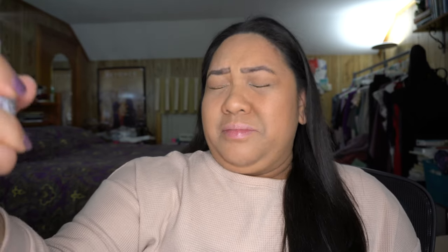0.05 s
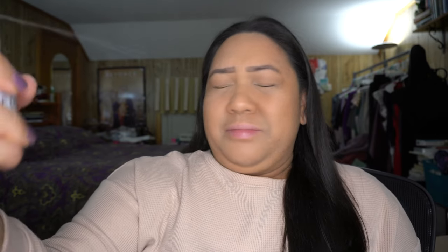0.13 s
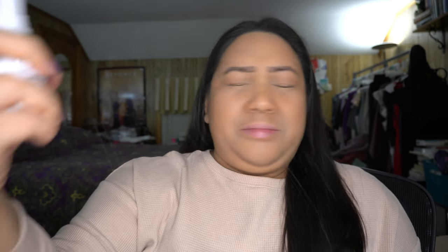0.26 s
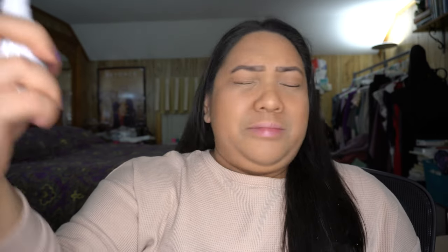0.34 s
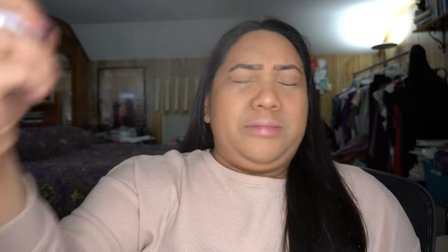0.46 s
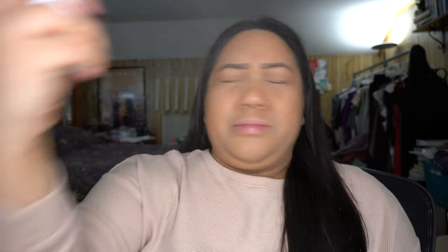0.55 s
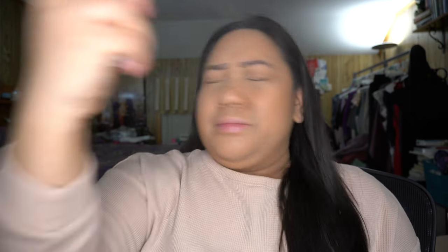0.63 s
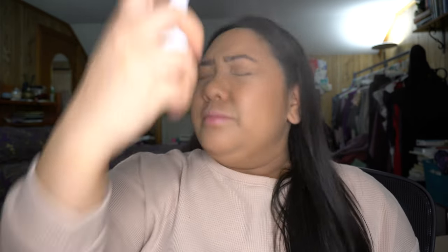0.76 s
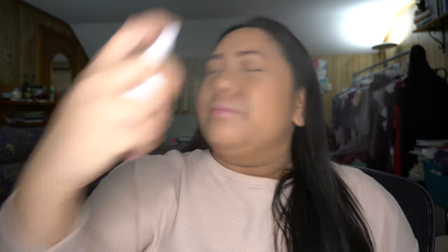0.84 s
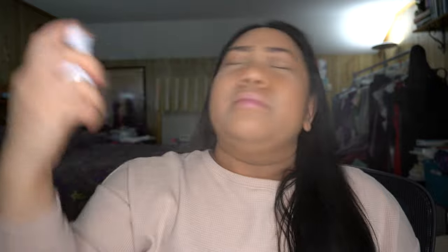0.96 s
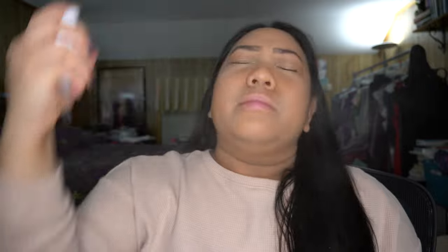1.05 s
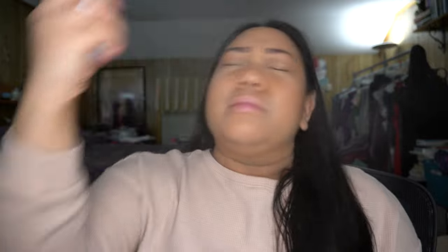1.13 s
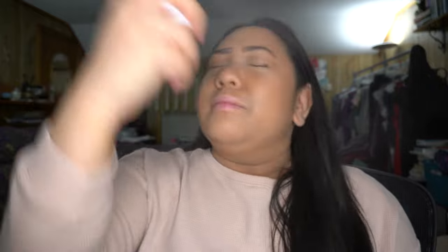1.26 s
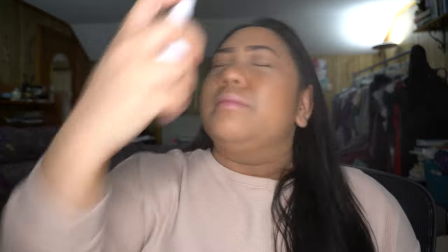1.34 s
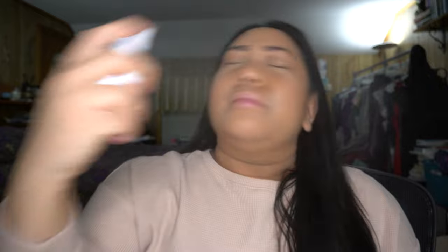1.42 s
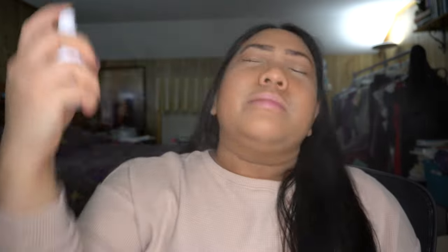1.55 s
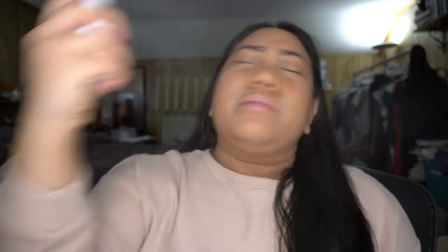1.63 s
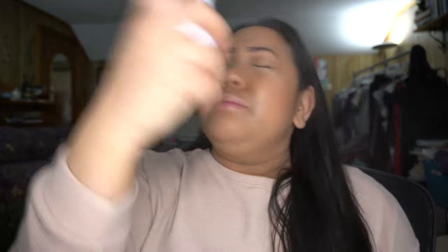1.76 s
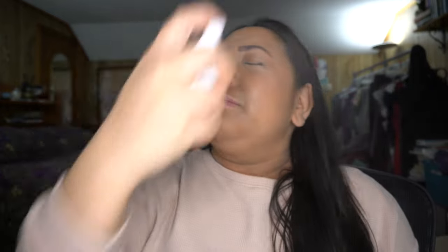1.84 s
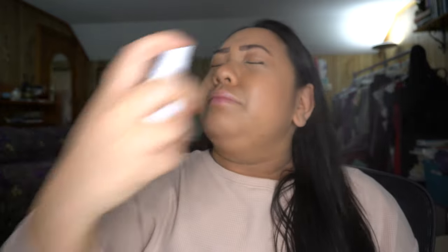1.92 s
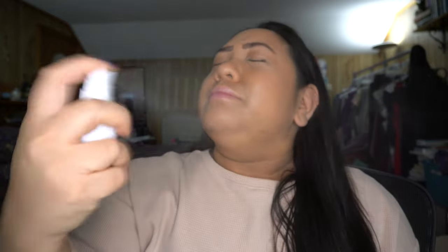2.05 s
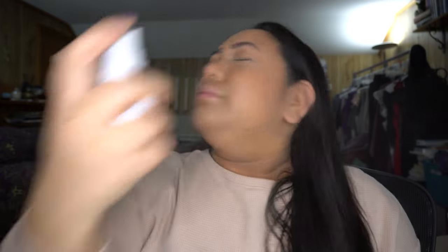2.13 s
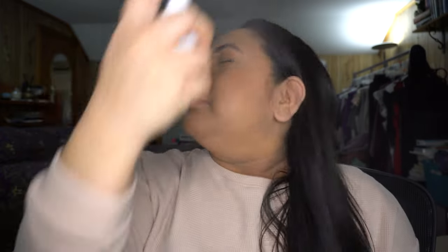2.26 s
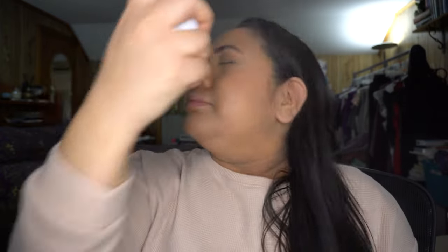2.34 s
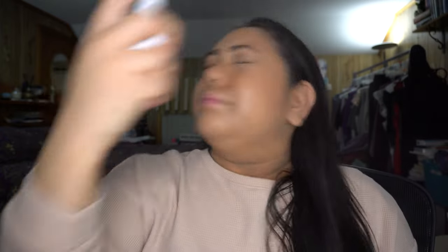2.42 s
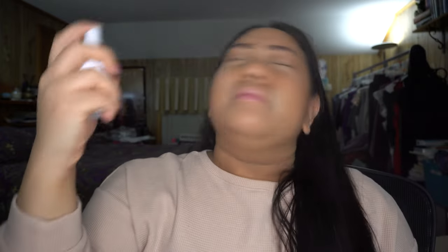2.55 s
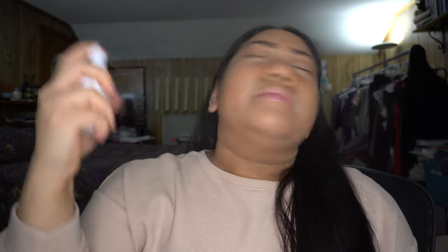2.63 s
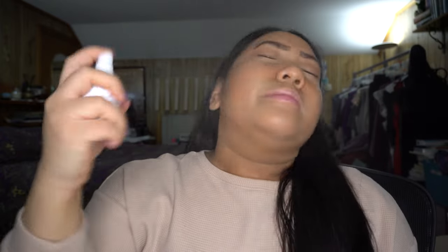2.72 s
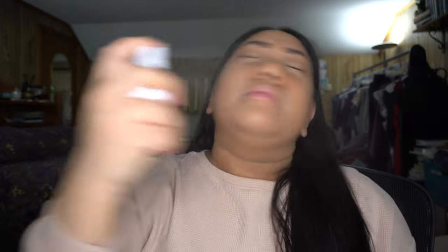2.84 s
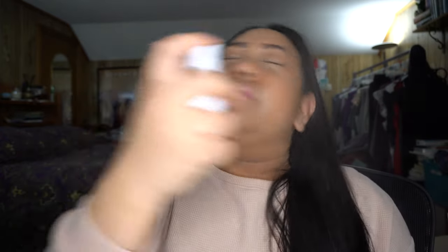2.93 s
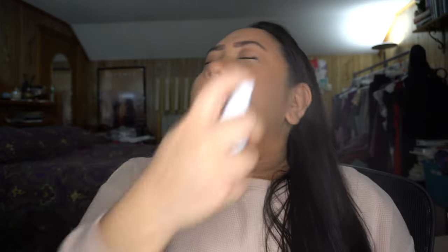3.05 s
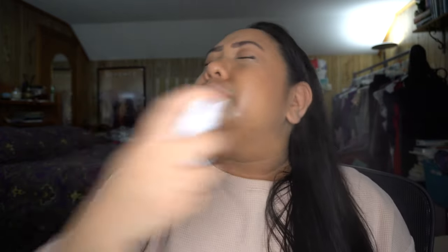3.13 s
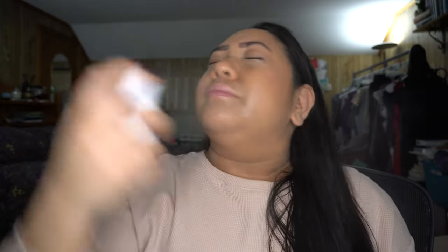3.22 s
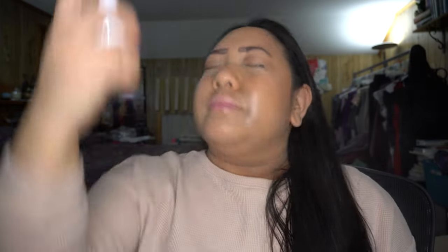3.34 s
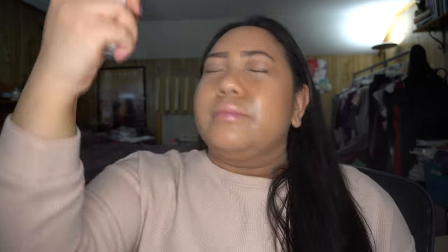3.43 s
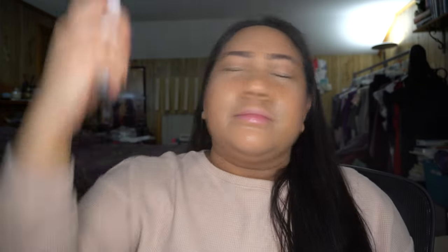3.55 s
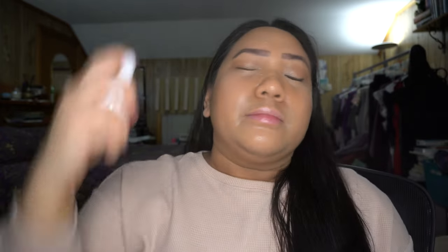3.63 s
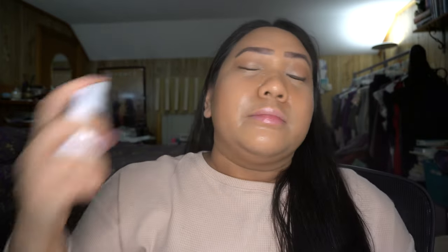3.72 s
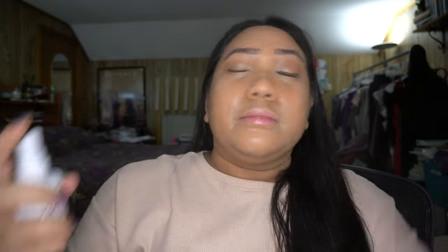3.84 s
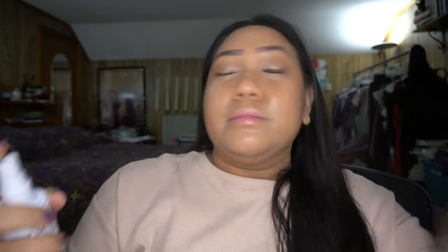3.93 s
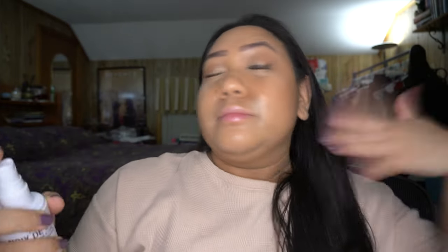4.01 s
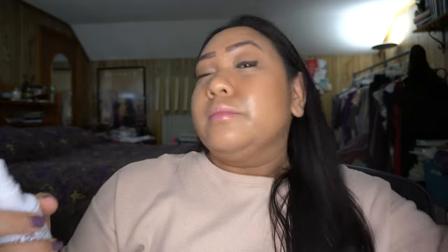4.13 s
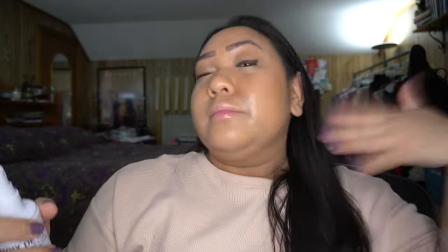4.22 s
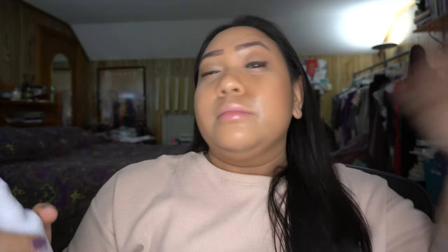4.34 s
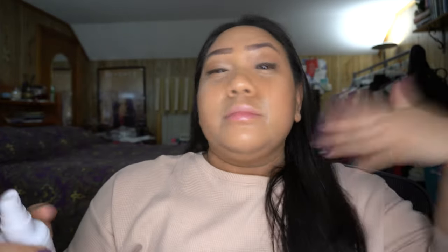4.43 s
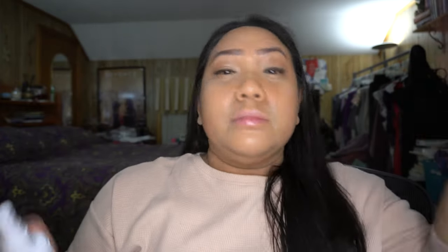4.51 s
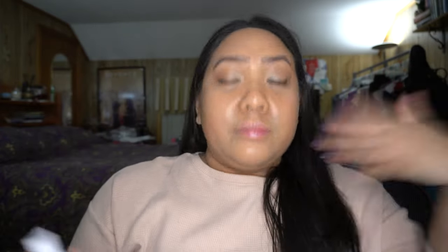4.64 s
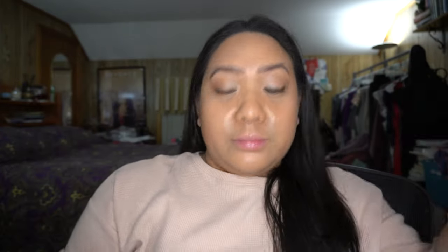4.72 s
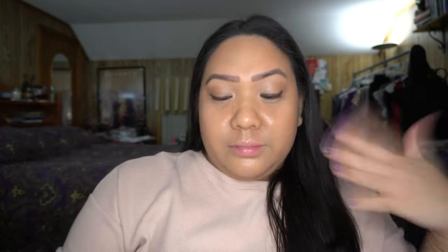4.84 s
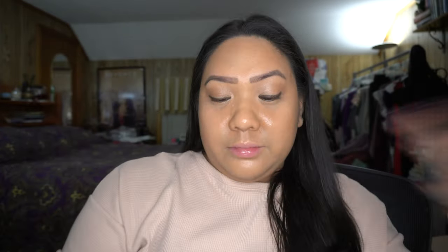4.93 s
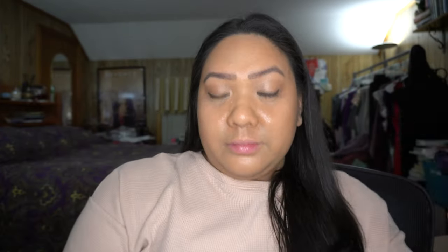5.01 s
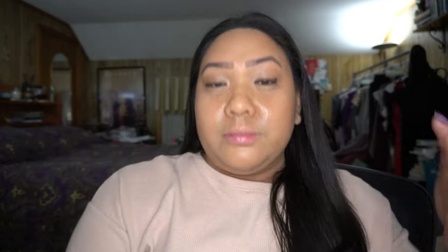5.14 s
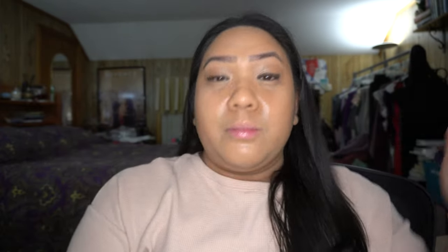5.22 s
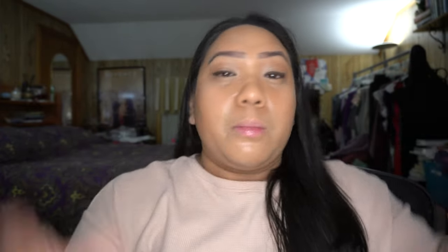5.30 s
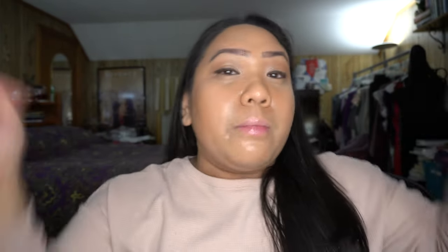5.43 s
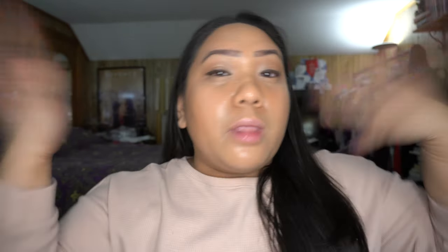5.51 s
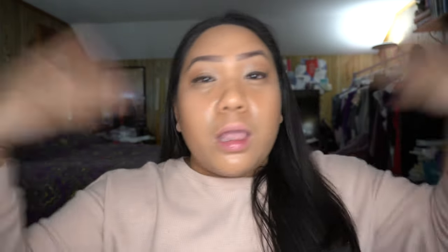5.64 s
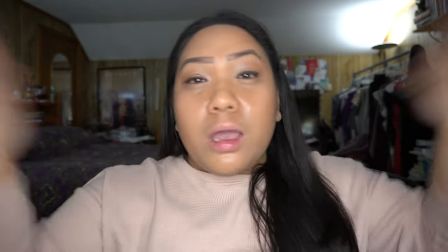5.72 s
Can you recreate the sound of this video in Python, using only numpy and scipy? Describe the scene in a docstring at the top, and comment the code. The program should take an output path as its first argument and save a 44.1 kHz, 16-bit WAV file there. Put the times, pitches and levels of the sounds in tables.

```python
"""Face mist from a pump bottle

A pump sprays eighteen times, about five a second, in a small furnished room. Its head ticks, a jet
hisses, the plunger plops at the end of a full stroke, and suction refills the chamber in between.
The bottle is then set on a desk, ringing its modes as it rocks to rest, and the lips smack sharply."""
import sys
import numpy as np
from scipy import signal
from scipy.fft import rfft, irfft, next_fast_len
from scipy.io import wavfile
from scipy.ndimage import uniform_filter1d

SR = 44100
rng = np.random.default_rng(int(sys.argv[2]) if len(sys.argv) > 2 else 0)


def int16_out(signal):
    """Quantize to a 16-bit WAV file."""
    q = np.round(np.clip(np.atleast_2d(signal).T, -1, 1) * 32767)
    wavfile.write(sys.argv[1], SR, q.astype(np.int16))


N = 254456

# The nozzle's hiss. Each row: frequency in Hz, relative spectral density in dB.
MIST_SPECTRUM = [(100, -29), (400, -18.5), (900, -10.5), (1300, -10.5), (1620, -3), (2300, -4),
                 (2900, -5.5), (3600, -1.5), (4600, -1.5), (5700, -9.5), (7300, -1.5), (9300, -8.5),
                 (11000, -4), (13000, -11.5), (15700, -12.5)]
# Each row: frequency in Hz, left-right coherence of the hiss.
MIST_COHERENCE = [(150, 0.14), (1000, 1), (3000, 0.86), (7000, 0.9), (15000, 0.99)]
# Pump strokes; short ones barely touch bottom. Each row: hiss start and length in seconds, level in dB,
# left over right in dB, slack from tick to hiss in seconds, tick level in dB, bottom plop level in dB.
STROKES = [(.069, 0.072, -32.5, 5.5, 0.034, -28.5, -67), (.386, 0.087, -30, 3.5, 0.024, -27.5, -43),
           (0.659, 0.096, -29, 1.2, 0.017, -23.5, -28.5), (.861, .098, -29.5, 1, 0.022, -21.5, -23.5),
           (1.056, 0.097, -30.5, 3, .0191, -20.5, -25.5), (1.243, 0.098, -29, 0, 0.015, -25, -23.5),
           (1.431, 0.098, -29.5, 1.9, 0.013, -28.5, -26.5), (1.637, 0.1, -29.5, 2, 0.014, -18, -30),
           (1.837, 0.089, -30, 1, 0.016, -16.5, -33.5), (2.026, .088, -30.5, 2.5, 0.019, -27, -27),
           (2.245, .096, -29.5, -0.5, 0.021, -23, -29.5), (2.472, .073, -32, 1.5, 0.03, -41, -41),
           (2.666, 0.091, -32.5, 2.5, 0.016, -25, -39), (2.853, 0.084, -31, 1.3, .027, -24.5, -36),
           (3.049, 0.08, -32.5, -1.5, .016, -25, -41), (3.233, 0.074, -31.5, 2.2, 0.017, -25.5, -53),
           (3.441, 0.079, -31, 2, .0202, -28.5, -57), (3.656, 0.03, -37, 2, 0.032, -29.5, -63)]
FIRM_DB = -28  # level of a firm stroke; effort is counted from it
TILT_DB, TILT_PER_DB = 1.21, 0.2  # its tilt in dB per octave, and the gain per dB of effort
JET_HZ, JET_HZ_PER_DB = 4100, 85  # the jet's resonance rises with effort too
PRIMING_TILT_DB, PRIMING_S = 10, .18  # air in the nozzle thins the first strokes: tilt, time constant

def sprays(attack_s=0.0029, release_s=0.0025, arch_db=3.5, sputter_db=0.87, face_echo=0.23,
           jet_gain=0.89, jet_width_hz=800, jet_scatter_hz=110, lag_s_per_db=8e-6, size=8192):
    """Jet noise: the hiss swells with the finger's pressure and stops when the valve shuts."""
    out, t = np.zeros((2, N)), np.arange(size) / SR
    sides = np.array([[.5], [-.5]])
    for start, length, db, pan_db, *_ in STROKES:
        effort_db = db - FIRM_DB
        air = np.exp((STROKES[0][0] - start) / PRIMING_S)
        tilt_db = TILT_DB + TILT_PER_DB * effort_db + PRIMING_TILT_DB * air
        jet_hz = JET_HZ + JET_HZ_PER_DB * effort_db + jet_scatter_hz * rng.standard_normal()
        tone = lambda hz: slope(hz, tilt_db) * (1 + jet_gain * resonance(hz, jet_hz, jet_width_hz))
        # a reflection off the face, at a new distance each time, combs the hiss
        echo_s = rng.uniform(0.000664, .002)
        comb = lambda hz: 1 + face_echo * np.exp(-2j * np.pi * hz * echo_s)
        # the louder side hears it sooner
        lead = lambda hz: np.exp(2j * np.pi * hz * lag_s_per_db * pan_db * sides)
        hiss = noise(MIST_SPECTRUM, MIST_COHERENCE, size, lambda hz: tone(hz) * comb(hz) * lead(hz))
        pressure = np.sin(np.pi * np.clip(t / length, 0, 1))
        valve = (1 - np.exp(-t / attack_s)) * np.exp(-np.maximum(t - length, 0) / release_s)
        # the liquid sheet breaks into droplets unevenly
        sputter = unit_rms(uniform_filter1d(rng.standard_normal(size), size=70))
        level_db = db + arch_db * (pressure - 0.7942) + sputter_db * sputter + pan_db * sides
        add(out, start, amp(level_db) * valve * hiss)
    return out


# The head's tick. Each row: frequency in Hz, relative spectral density in dB.
TICK_SPECTRUM = [(100, -54), (400, -2), (1500, 4), (2600, 2.5), (3400, 7), (4400, 4.5), (5700, -4.5),
                 (7500, -2), (11000, -6.5), (16000, -21.5)]
# The head springs back. Each row: start in seconds, plop level in dB, flight to the top stop in seconds,
# tick level in dB.
RETURNS = [(.219, -31, 0.023, -27.5), (.572, -33, 0.018, -23), (1.596, -35, .0061, -23.5),
           (1.8, -55, 0.0051, -31), (2.175, -29.5, .0075, -19.5), (2.413, -41.5, .0066, -24.5),
           (2.617, -38.5, .0064, -25), (3.003, -43, 0.0079, -32), (3.379, -30.5, 0.0048, -23.5),
           (3.6, -53, .0064, -28), (3.77, -41.5, 0.0076, -33.5)]
# The priming pump spits. Each row: start in seconds, snap level in dB, bubble level in dB.
SPITS = [(.034, -44, -31), (.0765, -21, -35), (0.0821, -21, -35), (0.1185, -18.5, -74), (.127, -22.5, -55)]
TAKE_UP_DB = -17  # plop as the plunger starts to move, relative to the tick
REBOUND_SHARE, REBOUND_DB = 0.89, -12.5  # a second tick: flight and level relative to the first
SLOSH_S, SLOSH_DB, SLOSH_HZ = 2.578, -37.5, 416  # liquid slaps the wall once as the hand turns

def plunger(tick_t60=0.011, press_tilt_db=0.3, return_tilt_db=2, spit_tilt_db=4, vary_tilt_db=1.46):
    """Impact excitation: the plastic head ticks and the chamber plops on the way down and back."""
    def tick(db, tilt_db):
        tilt_db += vary_tilt_db * rng.standard_normal()
        return amp(db) * snap(TICK_SPECTRUM, tick_t60, tilt_db=tilt_db)

    out = np.zeros((2, N))
    for start, length, _, _, slack, tick_db, bottom_db in STROKES:
        add(out, start - slack, tick(tick_db, press_tilt_db))
        add(out, start - slack, plop(tick_db + TAKE_UP_DB))
        add(out, start + length, plop(bottom_db))
    for start, plop_db, flight, tick_db in RETURNS:
        add(out, start, plop(plop_db))
        add(out, start + flight, tick(tick_db, return_tilt_db))
        add(out, start + flight * (1 + REBOUND_SHARE), tick(tick_db + REBOUND_DB, return_tilt_db))
    for start, snap_db, bubble_db in SPITS:
        add(out, start, tick(snap_db, spit_tilt_db))
        add(out, start, plop(bubble_db))
    add(out, SLOSH_S, plop(SLOSH_DB, SLOSH_HZ))
    return out


def plop(db, hz=651.5, glide=0.84, glide_s=0.0014, swell_s=0.0012, ring_db=-14, ring_t60=0.086,
         trim_db=-3.0, hard_db=-24, detune=0.045):
    """Damped oscillation: a pocket of liquid and air swings a few falling cycles, then rings faintly."""
    t = seconds(.1)
    pulse = (t / swell_s) ** 2 * np.exp(2 - 2 * t / swell_s)
    tail = amp(ring_db) * decay(t, ring_t60) * (1 - np.exp(-t / swell_s))
    # a harder stroke squeezes the chamber more, so its pitch starts higher
    squeeze = glide * np.sqrt(amp(db - hard_db)) * np.exp(-t / glide_s)
    pitch = hz * (1 + detune * rng.standard_normal() + squeeze)
    return amp(db + trim_db) * (pulse + tail) * np.sin(2 * np.pi * np.cumsum(pitch) / SR)


# The vent gulps air. Each row: centre in seconds, Gaussian width in seconds, level in dB.
GULPS = [(1.783, 0.011, -38), (2.18, 0.014, -54), (2.39, 0.018, -56), (3.001, .013, -44)]
REFILL_DB, REFILL_PER_DB = -53, 0.7  # suction after a firm stroke, and its growth per dB of effort
REFILL_AT, REFILL_WIDTH = 0.47, 0.26  # its centre and width, as shares of the pause between strokes

def refills(bubbling_db=3.5, whistle_hz=4300, whistle_width_hz=800, whistle_db=-7, gulp_whistle_db=-1):
    """Suction: as the plunger lifts, liquid fizzes through the ball valve and air whistles in the vent."""
    t = np.arange(N) / SR
    swell = lambda centre, width, db: amp(db) * np.exp(-((t - centre) / width) ** 2 / 2)
    suction = 0
    for (start, length, db, *_), (next_start, *_) in zip(STROKES, STROKES[1:]):
        pause = next_start - start - length
        suction_db = REFILL_DB + REFILL_PER_DB * (db - FIRM_DB)
        suction += swell(start + length + REFILL_AT * pause, REFILL_WIDTH * pause, suction_db)
    gulps = sum(swell(*gulp) for gulp in GULPS)
    fizz_gain = np.maximum(suction, gulps)
    whistle_gain = amp(whistle_db) * suction + amp(gulp_whistle_db) * gulps
    flutter = unit_rms(uniform_filter1d(rng.standard_normal(N), size=110))
    bubbling = unit_rms(amp(bubbling_db * flutter))
    # Each row: frequency in Hz, relative spectral density in dB.
    valve = [(100, -34), (300, -10), (700, -5.0), (1100, -3), (1800, -1.5), (2800, -5.0),
             (4100, -2.5), (5600, -6), (7500, -6.5), (11000, -11.5), (16000, -19)]
    whistle = noise(valve, MIST_COHERENCE, N, lambda hz: resonance(hz, whistle_hz, whistle_width_hz) ** 2)
    fizz = noise(valve, MIST_COHERENCE, N)
    return bubbling * (fizz_gain * fizz + whistle_gain * whistle)


# The bottle meets the desk. Each row: start in seconds, then desk thump, hollow ring and clack in dB.
KNOCKS = [(5.0636, -42, -38.5, -43), (5.0919, -30, -26, -16.5), (5.1158, -9.5, -23, -15),
          (5.164, -31, -45, -24)]
# Modes of the desk top and the hollow bottle. Each row: frequency in Hz, level in dB, t60 in seconds.
DESK_MODES = [(122, -21.5, 0.089), (182, -12, 0.077), (222, -14, 0.073), (293, -4.5, 0.042),
              (434, -6, 0.037), (493, -24, 0.027), (705, -14, 0.029), (860, -17.5, 0.015),
              (1124, -30, 0.095), (1560, -21, 0.022), (2960, -19, 0.0098)]
BOTTLE_MODES = [(538, 2.5, 0.041), (682, -2.5, 0.076), (807, -19, .045)]
# The clack of the base. Each row: frequency in Hz, relative spectral density in dB.
CLACK_SPECTRUM = [(100, -35), (400, -2), (900, 3), (1800, 0), (2400, -7), (3200, 7), (4200, -2.5),
                  (5200, -12), (7000, -13.5), (10000, -23), (16000, -33)]
BOUNCE_S, RESTITUTION = .0074, 0.95  # first flight, and each flight over the one before
THUMP_LOSS_DB, HOLLOW_LOSS_DB, CLACK_LOSS_DB = 1.5, 8, 12  # lost at each bounce
ROCK_START_S, ROCK_LENGTH_S = 5.14, 0.11
ROCK_PER_S, ROCK_SPEEDUP_PER_S2 = 180, 1500  # the rim's contacts come ever faster
ROCK_DB, ROCK_HOLD_S, ROCK_FADE_DB_PER_S = -29.5, .078, 203

def set_down(clack_t60=0.02, scatter_s=.0009, rattle_db=-17, radiate_hz=115, size=4096, contacts=4):
    """Inelastic collision: the bottle bounces and rocks to rest, and every contact rings the desk."""
    out, t = np.zeros((2, N)), np.arange(size) / SR
    for start, thump_db, hollow_db, clack_db in KNOCKS:
        for k in range(contacts):
            thump = amp(thump_db - k * THUMP_LOSS_DB) * ring(DESK_MODES, t)
            hollow = amp(hollow_db - k * HOLLOW_LOSS_DB) * ring(BOTTLE_MODES, t, detune=0.052)
            clack = amp(clack_db - k * CLACK_LOSS_DB) * snap(CLACK_SPECTRUM, clack_t60, size)
            add(out, start, thump + hollow + clack)
            start += BOUNCE_S * RESTITUTION ** k
    # the rim touches down unevenly in time and strength
    clock = seconds(ROCK_LENGTH_S)
    touch_count = np.floor(ROCK_PER_S * clock + ROCK_SPEEDUP_PER_S2 * clock ** 2 / 2)
    for age in clock[1:][np.diff(touch_count) > 0]:
        late, strength = rng.standard_normal(2)
        db = ROCK_DB - ROCK_FADE_DB_PER_S * max(age - ROCK_HOLD_S, 0) + 2 * strength
        touch = ring(DESK_MODES, t) + amp(rattle_db) * snap(CLACK_SPECTRUM, clack_t60, size)
        add(out, ROCK_START_S + age + scatter_s * late, amp(db) * touch)
    # air slips round the desk top, so it radiates little bass
    return signal.sosfilt(signal.butter(2, radiate_hz, "highpass", fs=SR, output="sos"), out)


# A lip smack: two sharp cracks, two close echoes, then faint after-clicks.
# Each row: start in seconds, level in dB, t60 in seconds, relative cavity level in dB.
SMACK_TRANSIENTS = [(5.6502, -3.5, 0.013, -31), (5.6533, -14, 0.019, -34), (5.656, -12.5, 0.021, -5.5),
                    (5.6585, -19.5, 0.018, -5.5), (5.669, -37, 0.046, 12), (5.756, -36, 0.035, -17)]
# The smack's noise. Each row: frequency in Hz, relative spectral density in dB.
SMACK_SPECTRUM = [(300, -25), (1400, -3), (2050, -10), (2800, 3.5), (3600, -4), (4400, 4.5), (5600, -13),
                  (7000, 1.5), (8500, -17), (10000, 4), (11800, -18), (13500, -10), (15700, -27)]
# The mouth cavity. Each row: frequency in Hz, level in dB, t60 in seconds.
MOUTH_MODES = [(476, -7, 0.023), (900, -8.5, 0.019), (1400, -6, 0.013), (2494, -9, 0.039),
               (4500, -28, 0.045)]

def lip_smack(size=4096):
    """Cavity resonance: wet lips crack twice and ring the mouth; close echoes and faint clicks follow."""
    out, t = np.zeros((2, N)), np.arange(size) / SR
    for start, db, t60, cavity_db in SMACK_TRANSIENTS:
        burst = snap(SMACK_SPECTRUM, t60, size)
        cavity = amp(cavity_db) * ring(MOUTH_MODES, t, spread_db=1.8, detune=.04)
        add(out, start, amp(db) * (burst + cavity))
    return out


# Each row: frequency in Hz, reverberation time t60 in seconds.
ROOM_T60 = [(150, 0.31), (1000, 0.36), (4000, 0.18), (14000, 0.12)]

def in_room(dry, wet_db, gap_s=.004):
    """Reverberation: a furnished room adds a short tail, more coherent towards the bass."""
    white = noise([(100, 0), (16000, 0)], coherence=[(200, 1.0), (1000, 0.71), (4000, 0.17)], size=16384)
    hz, t, bands = signal.stft(white, SR, nperseg=256)
    _, tail = signal.istft(bands * decay(t, along(ROOM_T60, hz)[:, None]), SR, nperseg=256)
    tail = np.pad(tail / np.linalg.norm(tail[0]), ((0, 0), (round(gap_s * SR), 0)))
    return dry + amp(wet_db) * signal.fftconvolve(dry, tail, axes=1)[:, :N]


# The room's background. Each row: frequency in Hz, relative spectral density in dB.
AMBIENT_SPECTRUM = [(15, -27), (30, -11), (60, -4.5), (100, -5), (200, -6.5), (300, -12.5), (500, -15.5),
                    (1000, -20), (2000, -23), (4000, -27), (8000, -31.7), (15000, -35), (16000, -52)]
# Each row: frequency in Hz, left-right coherence of the background.
AMBIENT_COHERENCE = [(60, 1), (240, 0.43), (950, 0.033), (3800, 0.06), (15000, .25)]

def ambience(db=-54.5):
    """Stationary noise: the room rumbles and hisses steadily."""
    return amp(db) * noise(AMBIENT_SPECTRUM, AMBIENT_COHERENCE, N)


# Each row: frequency in Hz, left-right coherence of clicks and clacks.
SNAP_COHERENCE = [(300, 1), (3000, 0.52), (12000, 0.19)]

def snap(spectrum, t60, size=4096, attack_s=0.00025, tilt_db=0):
    """A broadband transient: noise rises abruptly and decays exponentially."""
    t = np.arange(size) / SR
    burst = noise(spectrum, SNAP_COHERENCE, size, lambda hz: slope(hz, tilt_db))
    return .5 * burst * decay(t, t60) * (1 - np.exp(-t / attack_s))


def ring(modes, t, contact_s=0.00086, spread_db=4.0, detune=0.018):
    """Modal superposition: each blow lands on a new spot, weighting and loading the modes anew."""
    hz, db, t60 = np.transpose(modes)[:, :, None]
    strength = amp(db + spread_db * rng.standard_normal(db.shape))
    hz = hz * (1 + detune * rng.standard_normal(hz.shape))
    partials = strength * np.cos(2 * np.pi * hz * t) * decay(t, t60)
    return (1 - np.exp(-t / contact_s)) * partials.sum(axis=0)


def noise(spectrum, coherence, size, colour=lambda hz: 1):
    """Partial coherence: independent mid and side noises mix into shaped stereo noise of rms 1."""
    padded = next_fast_len(size, real=True)
    hz = np.fft.rfftfreq(padded, 1 / SR)
    angle = np.arccos(np.clip(along(coherence, hz), -1, 1)) / 2
    mid, side = rfft(rng.standard_normal((2, padded))) * np.array([np.cos(angle), np.sin(angle)])
    gain = amp(along(spectrum, hz)) * colour(hz)
    return unit_rms(irfft(np.array([mid + side, mid - side]) * gain, padded)[:, :size])


def resonance(hz, centre_hz, width_hz):
    """A resonance peak of height 1."""
    return 1 / np.sqrt(1 + (2 * (hz - centre_hz) / width_hz) ** 2)


def slope(hz, tilt_db):
    """Spectral tilt of tilt_db an octave through the treble."""
    return amp(tilt_db * np.log2((hz + 500) / 5000))


def decay(t, t60):
    """Exponential decay, by 60 dB in t60 seconds."""
    return np.exp(-np.log(1000) * t / t60)


def amp(db):
    """Decibels to gain."""
    return 10 ** (np.asarray(db) / 20)


def unit_rms(x):
    """Normalisation to rms 1."""
    return x / np.sqrt(np.mean(x ** 2) + 1e-20)


def along(points, hz):
    """Interpolation of (Hz, value) points on a log frequency axis."""
    knots_hz, values = np.transpose(points)
    return np.interp(np.log(hz + 1), np.log(knots_hz + 1), values)


def seconds(length):
    """A time axis."""
    return np.arange(int(length * SR)) / SR


def add(track, start_s, sound):
    """Superposition of a sound on a track."""
    i = round(start_s * SR)
    track[..., i:i + sound.shape[-1]] += sound[..., :max(N - i, 0)]


def scene():
    """Superposition: pump, lips and desk reverberate over the room's steady background."""
    background = ambience()
    pump = in_room(sprays() + plunger() + refills(), wet_db=-11.0)
    lips = in_room(lip_smack(), wet_db=-15.0)
    desk = in_room(set_down(), wet_db=-8.5)
    return background + pump + lips + desk


def record(dry, low_hz=25, top_hz=16000):
    """Band limiting: the deepest bass is thinned and nothing passes above top_hz."""
    size = next_fast_len(N + SR // 2)
    hz = np.fft.rfftfreq(size, 1 / SR)
    highpass = 1j * hz / (low_hz + 1j * hz)
    return irfft(rfft(dry, size) * highpass * (hz < top_hz), size)[:, :N]


dry = scene()
out = record(dry)
int16_out(out)
```